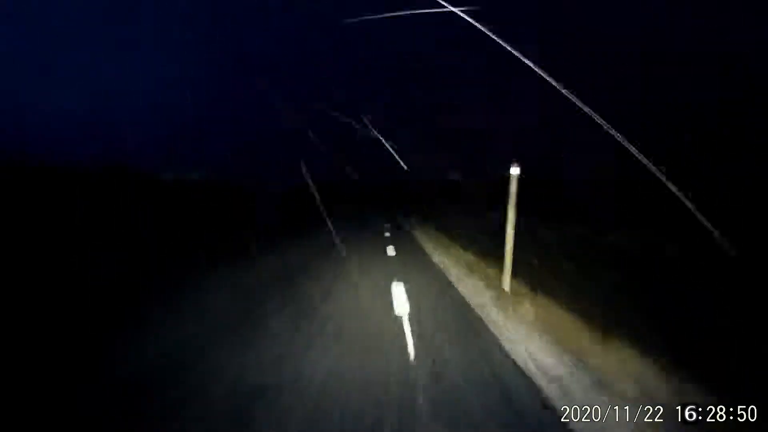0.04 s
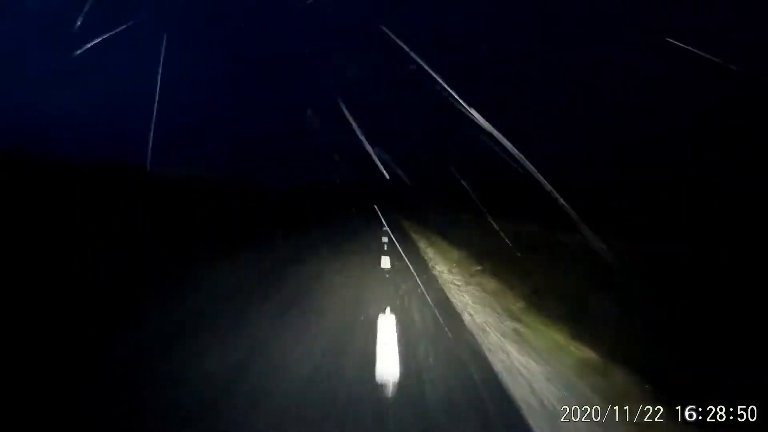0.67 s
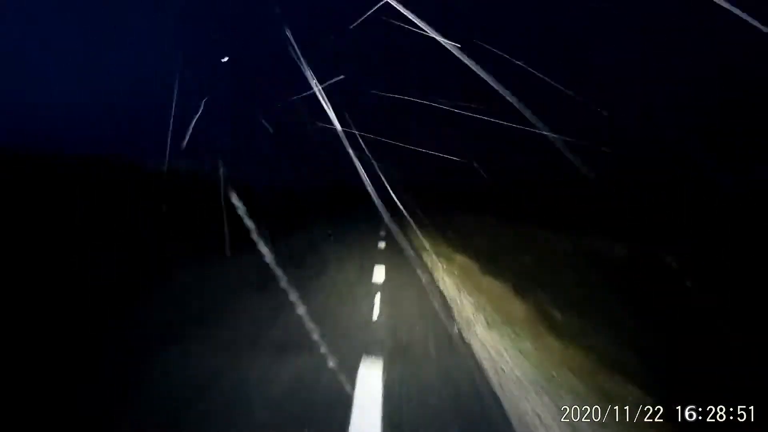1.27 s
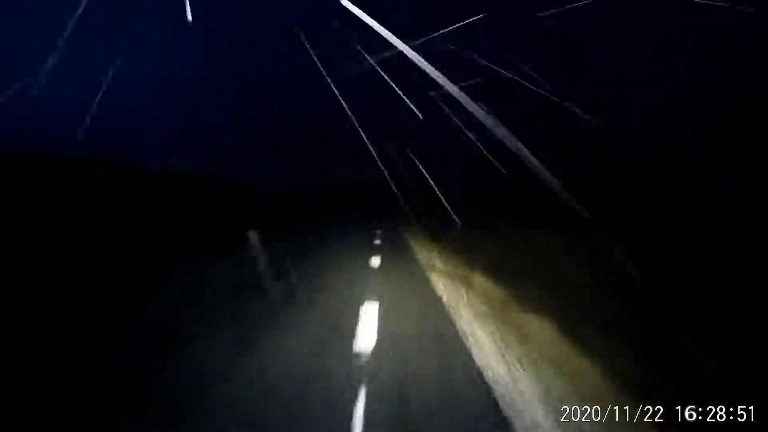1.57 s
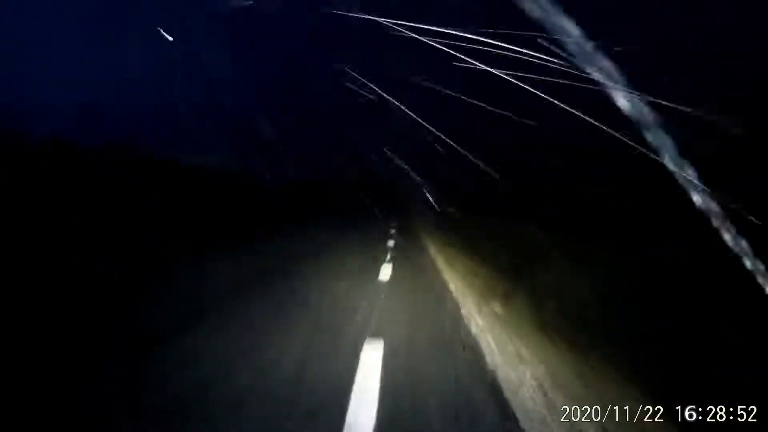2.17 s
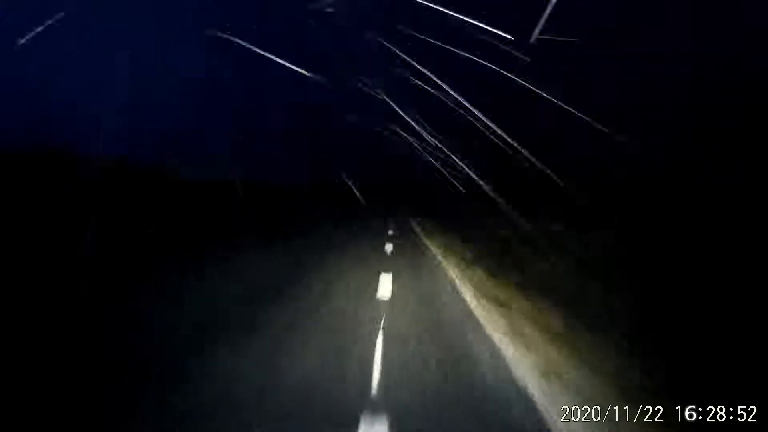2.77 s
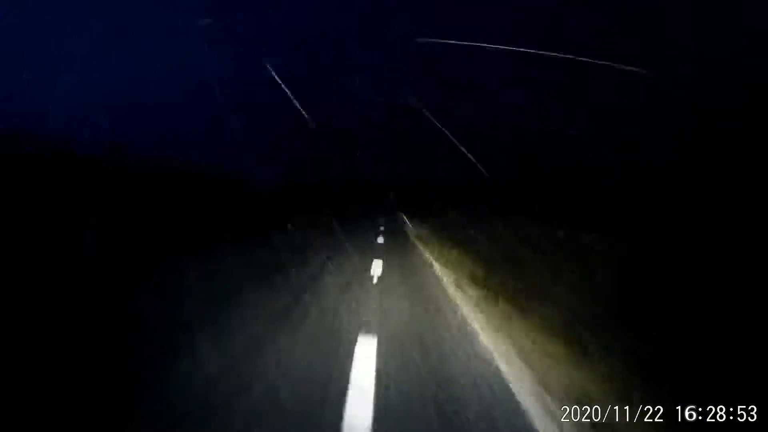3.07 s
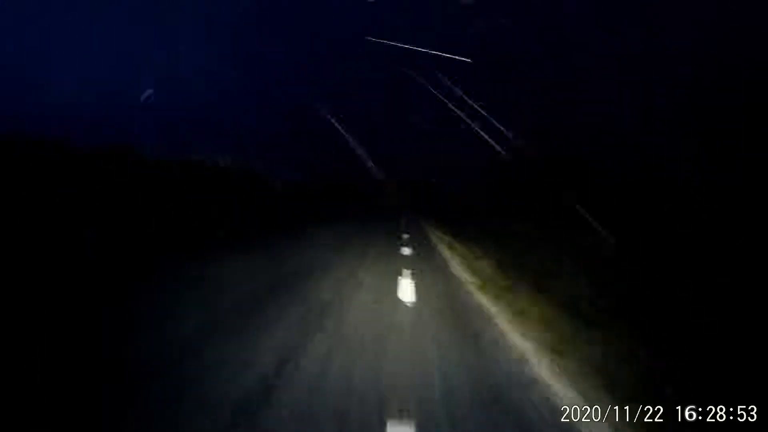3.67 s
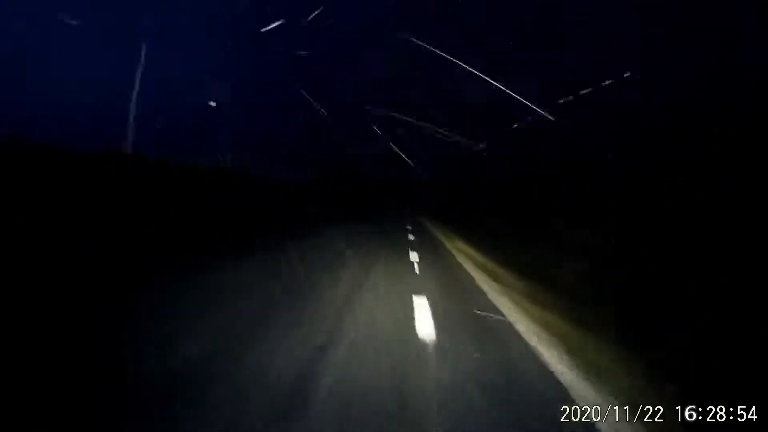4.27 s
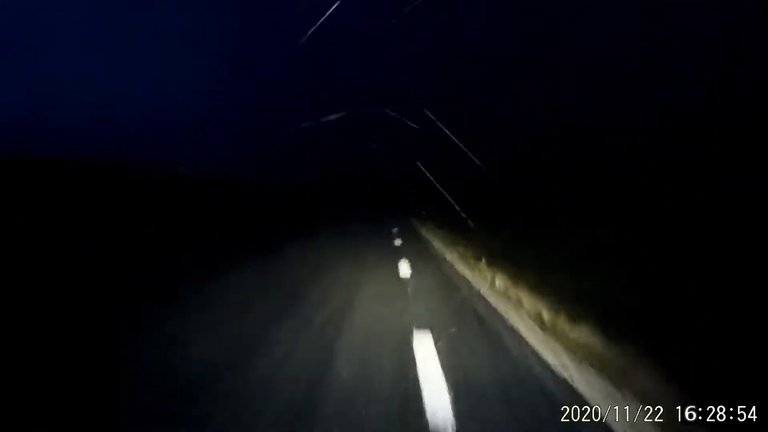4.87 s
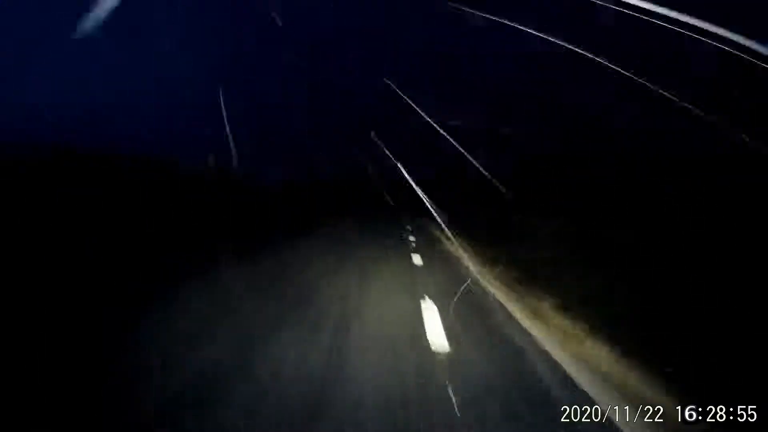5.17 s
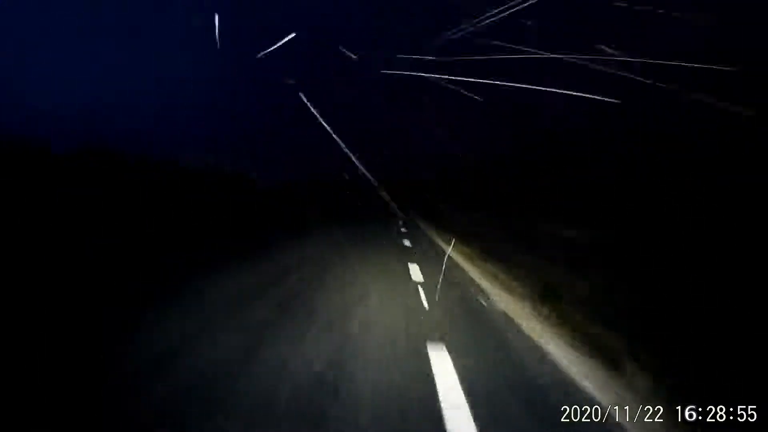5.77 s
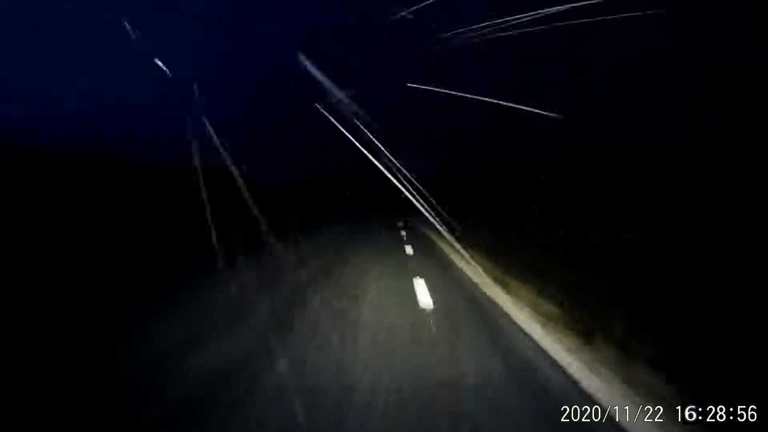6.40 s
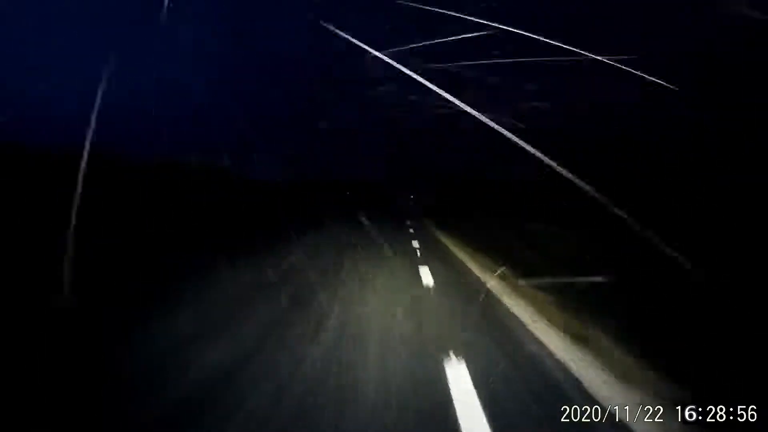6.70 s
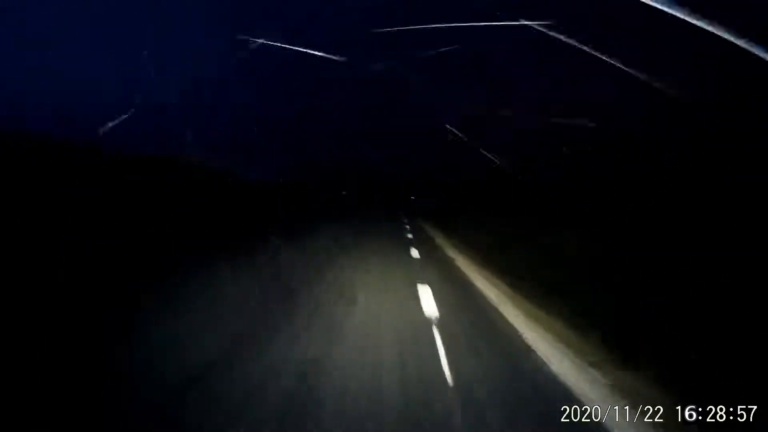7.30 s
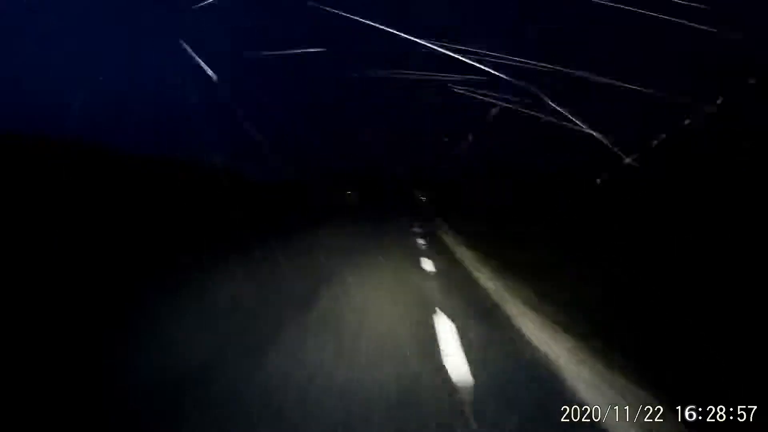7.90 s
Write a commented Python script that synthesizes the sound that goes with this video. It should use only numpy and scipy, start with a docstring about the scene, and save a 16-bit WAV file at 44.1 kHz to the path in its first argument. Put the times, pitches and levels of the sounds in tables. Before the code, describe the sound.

Irregular hailstones click against a rolling bike and its camera over tyre hiss and low rumble, with wind building later on.

```python
"""A bicycle on a country road in a night hail shower, heard from a camera fixed to it.
From the start the road shakes frame and mount, and the tyres hiss and spit wet grit. Hail ticks on
the camera shell, knocks on the bike and now and then pings off metal. Wind builds, puffs from 5 s
and swells over the microphone from 6 s. Near 7 s stones clack on hollow parts in a flurry;
by 8 s the gust has eased."""
import sys
import numpy as np
from scipy import signal
from scipy.fft import rfft, irfft
from scipy.io import wavfile
from scipy.ndimage import uniform_filter1d

SR = 44100
rng = np.random.default_rng(int(sys.argv[2]) if len(sys.argv) > 2 else 0)


def unload_audio(sound):
    """Save the sound as a 16-bit wav file, at the path given as the first command line argument."""
    columns = np.transpose(np.atleast_2d(sound))
    # keep every value between -1 and 1, then stretch to whole-number steps
    steps = np.round(np.clip(columns, -1, 1) * 32767)
    wavfile.write(sys.argv[1], SR, steps.astype(np.int16))


N = 355005

# Table levels are relative; each source adds its own gain.
# frame resonances: freq_hz, width_hz, level_db
FRAME_MODES = [(48.1, 29.3, -2.5), (133.6, 53, -6.5), (163.3, 60, 0.5), (247.3, 69.6, -5)]
# camera mount resonances: freq_hz, width_hz, level_db
MOUNT_MODES = [(423, 173, 4.5), (547, 145, -7), (700, 126, 0.6), (1049, 117, -6), (1216, 160, -4),
               (1345, 185, -10.5)]
# tubing and plastic resonances: freq_hz, width_hz, level_db
BIKE_MODES = [(1780, 600, 2.5), (2596, 490, 2.5), (3430, 410, -2), (4350, 460, -5), (4790, 340, -4),
              (5420, 710, 0), (6500, 800, -4.5), (7900, 770, -2), (9100, 2100, -2.5)]
# metal part modes: freq_hz, level_db, t60_s
METAL_MODES = [(3040, -5, 0.053), (4520, -15, 0.025), (6520, -2, 0.014), (9050, 3, 0.0093),
               (12200, -1.5, 0.016), (13950, -9, .018)]
# hollow part modes: pitch_ratio, level_db, t60_s
HOLLOW_MODES = [(0.66, -15, 0.0055), (1, 0, 0.0059), (1.3, -20, 0.004)]
# bumps and smooth patches: centre_s, length_s, frame_change_db, mount_change_db
ROAD_BUMPS = [(0.53, 0.063, 2.5, 4.5), (0.69, 0.037, 4.5, -1.5), (0.82, 0.16, -1, -4.5),
              (1.16, 0.3, -0.5, 2), (1.39, 0.027, 4, 5), (1.5, 0.06, 4, 4), (2.03, 0.16, 0.5, 3),
              (2.16, 0.049, -2, -2.5), (2.72, 0.085, 5, 0.5), (3.36, 0.17, 1.5, 2), (3.74, 0.066, 0, 3.5),
              (3.91, 0.13, 0, -4.5), (4.46, 0.081, 2, 4.5), (4.55, 0.076, -6, -1.5), (5.08, 0.054, 5, -1),
              (5.53, 0.033, -3, 0), (5.83, 0.06, -3.5, -3), (6.12, 0.054, 3.5, 4), (6.66, 0.39, 2, 2),
              (7.41, 0.11, 2, 6)]
# tyre spray spectrum: freq_hz, density_db
SPRAY_SPECTRUM = [(1000, 16.5), (1600, 6), (2000, 1), (2250, 1), (2640, 2.5), (3100, 0), (3480, 2),
                  (3950, -0.5), (4600, 2.5), (5000, -4.5), (5400, 2.5), (6200, -2.5), (7400, -1.5),
                  (8000, -1.5), (10000, -8.5), (12000, -9.5), (14200, -7), (15300, -8), (16500, -33)]
# spray and grit off the wet road: time_s, level_db
WET_CURVE = [(0.0, -57), (0.65, -58.5), (0.85, -60.5), (1.17, -56.5), (1.9, -61), (2.95, -60.5),
             (3.45, -57.5), (3.92, -61.5), (4.45, -57.5), (4.82, -59.5), (5.15, -58), (5.6, -59.5),
             (6.37, -54), (6.85, -52), (7.6, -52.5), (7.82, -57.5), (8.05, -55.5)]
# one long gust: time_s, level_db, turbulence_edge_hz
GUST_CURVE = [(0, -72, 900), (4.8, -50.5, 930), (5.85, -58, 930), (5.99, -37.5, 835), (6.27, -41.5, 1030),
              (6.35, -41, 1230), (6.5, -38, 1240), (6.62, -35.5, 1310), (6.95, -44.5, 1330),
              (7.06, -40.5, 2010), (7.16, -40.5, 1450), (7.33, -42.5, 1720), (7.7, -41.5, 1390),
              (7.86, -48, 1370), (8.05, -50, 1490)]
# puffs on top of the gust: centre_s, length_s, extra_db
AIR_PUFFS = [(5.09, 0.17, 15), (5.32, 0.1, 16), (5.72, 0.11, 18.5), (5.9, 0.03, 11.5), (6.35, 0.03, 7),
             (6.42, 0.064, 4), (7.425, 0.016, 7)]
# stones on metal: start_s, level_db, upper_modes_db
METAL_HITS = [(0.5822, -45, 0), (5.1652, -41.5, -6), (6.5065, -42, 1), (6.939, -34.5, -1)]
# hard stones on hollow parts: start_s, energy_db, pitch_hz
HOLLOW_HITS = [(3.3674, -14.5, 2700), (4.5255, -20.5, 1740), (7.0274, -23, 1800), (7.0306, -19, 1750),
               (7.037, -20, 2100), (7.0402, -18, 1700), (7.0503, -22, 1600), (7.06, -16, 2010),
               (7.068, -21, 1950), (7.079, -16, 1780), (7.0858, -10, 1850), (7.089, -17.5, 2000),
               (7.0922, -14.5, 2460), (7.1088, -19, 1740), (7.1186, -19, 1700), (7.1415, -20, 1750),
               (7.171, -25, 1600), (7.2935, -24, 1900), (7.3126, -12, 2020), (7.3205, -21, 1650),
               (7.365, -19, 2100), (7.388, -19, 1440), (7.428, -19, 1600), (7.4315, -21, 1500)]
# stones on the camera shell: start_s, ring_db, crack_db, body_db, ring_hz, crack_hz
SHELL_HITS = [(0.046, -29, -19, -31, 13900, 8800), (0.0797, -25, -19, -31, 14800, 8150),
              (0.2578, -32, -28, -28, 14100, 7100), (0.6412, -32, -24, -39, 13800, 8700),
              (0.65, -29, -24, -39, 14500, 8900), (1.0876, -21.5, -16.5, -22.5, 12400, 6400),
              (1.2428, -23.5, -19, -27, 12000, 6700), (1.5656, -28, -24.5, -29, 13300, 8100),
              (2.1575, -33, -32, -45, 13700, 7100), (2.5747, -20, -7, -34, 14200, 7700),
              (2.5854, -33, -19, -26, 12200, 8600), (2.9265, -31, -34, -39, 12800, 7700),
              (3.3666, -23, -18.5, -20, 13800, 7200), (3.432, -19, -15.5, -30, 11700, 7300),
              (3.5313, -28, -32, -46, 14100, 8900), (3.567, -28, -19.5, -34, 12200, 7900),
              (3.579, -28, -25, -21, 11800, 5900), (3.9341, -17.5, -14.5, -24, 11900, 6500),
              (4.155, -28, -22, -41, 14100, 8000), (4.276, -27, -21, -23, 11400, 6200),
              (5.1426, -3.5, -10, -20, 13900, 6000), (5.5985, -24, -19.5, -30, 12000, 6700),
              (6.7032, -27, -24.5, -36, 12100, 6400), (6.706, -29, -20, -35, 12100, 6600),
              (6.7394, -24, -19, -35, 12800, 7600), (6.7857, -21, -13, -17, 12000, 7700),
              (6.79, -14, -7.5, -27, 12300, 7200), (7.0818, -29, -17, -19, 13600, 6100),
              (7.2603, -19, -9, -25, 11700, 8750), (7.276, -25, -16, -35.5, 13100, 6800),
              (7.3617, -27, -18.5, -31, 11100, 8600), (7.4673, -10, -7.5, -17, 12900, 6100),
              (7.485, -22, -11, -29, 11700, 7600), (7.5305, -16, -10, -15, 12100, 6760)]
# distinct cracks and dull thuds on the bike and mount, from hail or a sudden puff: start_s, crack_db, pitch_hz,
# thud_db
KNOCKS = [(0.0415, -27, 4200, -20), (0.1375, -28, 3400, -32), (0.1734, -23.5, 3500, -31),
          (0.1835, -36, 2800, -34), (0.2671, -26, 2500, -32), (0.2743, -29, 3200, -19.5),
          (0.3284, -32, 3200, -36), (0.4442, -23.5, 3100, -21), (0.4511, -38, 3600, -28),
          (0.5197, -26.5, 2900, -31), (0.5435, -25.5, 2500, -16), (0.6816, -27, 3500, -29),
          (0.6999, -21, 3700, -21), (0.7864, -34, 3600, -26), (0.8475, -32, 3200, -35),
          (0.9351, -36, 4100, -31), (0.9872, -23.5, 3100, -23), (0.9941, -31, 3400, -24),
          (1.0059, -29, 3600, -28), (1.0307, -30, 2800, -35), (1.0852, -33, 3300, -15),
          (1.1201, -24, 3100, -39), (1.1398, -26, 4800, -17), (1.1571, -25, 5700, -26),
          (1.1731, -26, 2700, -16), (1.1963, -27, 2800, -21), (1.2296, -27, 2700, -26),
          (1.2546, -23, 2600, -21), (1.2664, -24, 3500, -24), (1.3229, -30, 3700, -38),
          (1.3865, -25.5, 3300, -21.5), (1.4608, -31, 5000, -30), (1.4841, -27, 3600, -25),
          (1.6403, -24, 4000, -32), (1.6476, -29, 4780, -39), (1.7297, -28.5, 7200, -36),
          (1.7475, -29, 3200, -19), (1.7943, -29, 4000, -24), (1.9455, -28, 3300, -27),
          (2.0173, -26, 3200, -32), (2.0263, -24.5, 2980, -28), (2.2849, -26, 3100, -20),
          (2.332, -30, 5300, -28), (2.4777, -33, 2800, -22), (2.5263, -25.5, 3400, -22),
          (2.5601, -29, 5300, -39), (2.736, -30, 4300, -26), (2.7715, -30, 2900, -24),
          (2.9553, -28, 6500, -37), (3.0493, -32, 3600, -39), (3.1368, -27, 3600, -13.5),
          (3.1499, -27, 4600, -30), (3.306, -29, 5000, -19.5), (3.3169, -28, 3700, -26),
          (3.3265, -28, 3000, -29), (3.412, -25, 3700, -17), (3.4244, -28, 3100, -21),
          (3.474, -29, 3800, -24), (3.5938, -23.5, 4500, -26), (3.6558, -26, 4380, -32),
          (4.1085, -25, 5200, -23), (4.2135, -27, 4100, -19.5), (4.2613, -27, 4000, -22),
          (4.3456, -24, 4880, -18), (4.3948, -31, 4000, -20), (4.4686, -27.5, 3300, -33),
          (4.5254, -24.5, 4600, -34), (4.6117, -28, 2900, -18), (4.6523, -25, 4000, -22),
          (4.746, -27.5, 3700, -30), (4.8238, -34, 3900, -19), (4.8625, -23.5, 4600, -19),
          (4.9206, -31, 3300, -20), (4.9927, -26.5, 5800, -36), (5.0238, -28, 3700, -26),
          (5.0505, -25, 4800, -22), (5.1655, -30, 5100, -32), (5.2518, -31, 3400, -30),
          (5.266, -26, 4300, -21), (5.2998, -27, 5300, -26), (5.4836, -26.5, 4300, -22),
          (5.5039, -25.5, 3500, -21), (5.6775, -46, 3800, -22.5), (5.7635, -23, 5000, -16),
          (5.8895, -28, 5000, -21), (5.955, -34, 3500, -21), (6.244, -27, 5100, -17),
          (6.2787, -27, 4400, -15), (6.299, -38, 3500, -22), (6.3372, -39, 3200, -12),
          (6.4125, -34, 3400, -12.5), (6.429, -23, 2700, -14), (6.6088, -26, 2500, -20),
          (6.7228, -23, 2500, -27), (6.8635, -22, 3400, -19), (6.8975, -20, 3900, -16.5),
          (6.9814, -26.5, 3900, -16), (7.0399, -21, 2900, -19), (7.05, -21, 4100, -28),
          (7.1087, -23, 2400, -14), (7.1826, -25, 5100, -29), (7.2891, -24, 3400, -14),
          (7.3293, -24, 5230, -20), (7.3475, -21, 2700, -16), (7.427, -21, 3400, -12),
          (7.5186, -25, 5100, -32), (7.6045, -23, 3500, -19), (7.6312, -26, 4600, -25.5),
          (7.6799, -24, 5000, -24), (7.9829, -24, 2700, -29), (8.022, -29, 3400, -22)]

WHEEL_HZ, WHEEL_PEAK_S = 2.97, 0.004


def from_db(db):
    return 10 ** (np.asarray(db) / 20)


def unit_rms(x):
    return x / np.sqrt(np.mean(x ** 2) + 1e-20)


def unit_energy(x):
    return x / np.sqrt(np.sum(x ** 2) + 1e-20)


def evened(x, window_s):
    """Divide by the running rms."""
    return x / np.sqrt(np.maximum(uniform_filter1d(x ** 2, int(window_s * SR) + 1), 1e-12))


def curves(rows):
    """Table columns interpolated to every sample."""
    time_s, *columns = np.transpose(rows)
    return [np.interp(np.arange(N) / SR, time_s, column) for column in columns]


def swells(rows):
    """Gaussian rises and dips, one dB curve per level column."""
    t = np.arange(N) / SR
    return sum(np.outer(levels_db, np.exp(-(2 * (t - centre_s) / length_s) ** 2))
               for centre_s, length_s, *levels_db in rows)


def drift(rate_hz):
    """Smooth random wander, rms 1."""
    hop, settle = 40, 2000
    pole = np.exp(-2 * np.pi * rate_hz * hop / SR)
    noise = rng.standard_normal(N // hop + settle + 2)
    slow = signal.lfilter([1], [1, -2 * pole, pole * pole], noise)[settle:]
    return np.interp(np.arange(N) / hop, np.arange(len(slow)), unit_rms(slow))


def butter(x, cutoff_hz, kind, order=2):
    return signal.sosfilt(signal.butter(order, cutoff_hz, kind, fs=SR, output="sos"), x)


def resonate(x, hz, width_hz):
    r = np.exp(-np.pi * width_hz / SR)
    feedback = [1, -2 * r * np.cos(2 * np.pi * hz / SR), r * r]
    return signal.lfilter(np.array([1, 0, -1]) * (1 - r * r) / 2, feedback, x)


def coupling(mode_hz, pitch_hz, span_octaves):
    """How strongly a contact of a given pitch excites a mode."""
    return 1 / np.sqrt(1 + (2 * np.log2(mode_hz / pitch_hz) / span_octaves) ** 2)


def add(out, start_s, sound):
    at = int(np.clip(round(start_s * SR), 0, N - 1))
    out[at:at + len(sound)] += sound[:N - at]


def shaken(modes):
    """Steep-sided resonances driven by random road bumps; rms 1."""
    out = 0
    for hz, width_hz, db in modes:
        band = resonate(rng.standard_normal(N), hz, width_hz)
        out += from_db(db) * unit_rms(resonate(band, hz, width_hz))
    return unit_rms(out)


def frame_rumble(load_db):
    """The road shakes the frame's low modes."""
    level_db = -40.5 + load_db + drift(2.3)
    return from_db(level_db) * evened(shaken(FRAME_MODES), window_s=0.13)


def tyre_hiss(clumps):
    """Water torn from the road by the tread; rms 1."""
    hz, db = np.transpose(SPRAY_SPECTRUM)
    bins_hz = np.fft.rfftfreq(N, 1 / SR) + 1
    colour = from_db(np.interp(np.log(bins_hz), np.log(hz), db))
    spray = irfft(rfft(clumps * rng.standard_normal(N)) * colour, N)
    return unit_rms(butter(spray, 1060, "high"))


def grains(clumps, base_per_s, spread_db):
    """Random contacts of uneven size, crowded into clumps."""
    born = rng.random(N) < base_per_s * clumps ** 2 / SR
    size_db = spread_db * np.minimum(rng.exponential(1, N), 3)
    return born * from_db(size_db) * rng.choice([-1, 1], N)


def grit_patter(clumps):
    """Grit and small ice tap the bike's modes, each grain around its own pitch; rms 1."""
    clicks = grains(clumps, base_per_s=160, spread_db=2.5)
    low_hz, high_hz = BIKE_MODES[0][0], BIKE_MODES[-1][0]
    pitch_hz = low_hz * (high_hz / low_hz) ** rng.random(N)
    ticks = 0
    for hz, width_hz, db in BIKE_MODES:
        taps = clicks * coupling(hz, pitch_hz, span_octaves=0.39) * rng.choice([-1, 1], N)
        ticks += from_db(db) * resonate(taps + 1e-18, hz, width_hz) / np.sqrt(width_hz)
    return unit_rms(butter(ticks, [1500, 9500], "band"))


def sleet(clumps):
    """The finest ice pricks the camera shell; rms 1."""
    clicks = grains(clumps, base_per_s=100, spread_db=-1.0)
    return unit_rms(resonate(clicks + 1e-18, hz=13500, width_hz=3200))


def mount_buzz(load_db, wind_db):
    """The mount buzzes with the road; wind shakes it harder."""
    road_db = -45.5 + load_db + 1.82 * drift(15)
    drive = np.hypot(from_db(road_db), from_db(wind_db - 7.5))
    buzz = shaken(MOUNT_MODES) * from_db(2.0 * drift(51))
    return drive * evened(buzz, window_s=0.066)


def wind_roar(wind_db, edge_hz):
    """Eddies at the microphone port: fluttering half-octave bands, rolled off above edge_hz."""
    shared_db = 2.0 * np.clip(drift(35), -2, 1.5)
    eddies = 0
    for hz in 100 * 2 ** np.arange(0, 6.5, 0.5):
        band = unit_rms(butter(rng.standard_normal(N), [hz / 2 ** 0.25, hz * 2 ** 0.25], "band"))
        shape = 1 / np.sqrt(1 + (hz / edge_hz) ** 10.5) / np.sqrt(1 + (0.26 * edge_hz / hz) ** 2.4)
        own_db = 3.5 * np.clip(drift(93), -2, 1.5)
        eddies += band * shape * from_db(shared_db + own_db)
    return from_db(wind_db) * evened(eddies, window_s=0.19)


def impact(modes, detune, contact_s):
    """One blow; the spot struck shifts and weights the modes. Unit energy."""
    t = np.arange(SR // 25) / SR
    ring = 0
    for hz, db, t60_s in modes:
        shift, weight, phase = rng.standard_normal(3)
        envelope = from_db(db + 2 * weight - 60 * t / t60_s)
        ring += envelope * np.sin(2 * np.pi * (hz * (1 + detune * shift) * t + phase))
    attack = 1 - np.exp(-(t / contact_s) ** 2)
    return unit_energy(ring * attack)


def ice_contact(t60_s, splinter_db):
    """A sharp contact, then a dying spray of splinters."""
    t = np.arange(SR // 40) / SR
    splinters = unit_energy(rng.standard_normal(len(t)) * from_db(-60 * t / t60_s))
    return signal.unit_impulse(len(t)) + from_db(splinter_db) * splinters


def metal_pings():
    """Stones glance off metal; a harder touch brings out the upper modes."""
    out, t = np.zeros(N), np.arange(SR // 8) / SR
    lowest, *upper = [from_db(db - 60 * t / t60_s) * np.sin(2 * np.pi * hz * t)
                      for hz, db, t60_s in METAL_MODES]
    for start_s, db, upper_db in METAL_HITS:
        add(out, start_s, from_db(db) * (lowest + from_db(upper_db) * sum(upper)))
    return out


def hollow_clacks():
    """Each struck hollow part rings for a few cycles at its own pitch."""
    out = np.zeros(N)
    for start_s, db, pitch_hz in HOLLOW_HITS:
        modes = [(pitch_hz * ratio, mode_db, t60_s) for ratio, mode_db, t60_s in HOLLOW_MODES]
        add(out, start_s, from_db(db) * impact(modes, detune=0.015, contact_s=0.00025))
    return out


def shell_ticks():
    """Hard ice on the plastic camera shell: high ring, thin crack, a little low body."""
    out, click = np.zeros(N), signal.unit_impulse(SR // 100)
    body = butter(click, [1500, 4400], "band")
    for start_s, ring_db, crack_db, body_db, ring_hz, crack_hz in SHELL_HITS:
        ring = resonate(click, ring_hz, width_hz=1500)
        ring = butter(butter(ring, 5200, "high"), 6000, "high")
        crack = resonate(ice_contact(t60_s=0.0075, splinter_db=-7.5), crack_hz, width_hz=1550)
        crack = butter(butter(crack, 3700, "high"), [4400, 11000], "band")
        add(out, start_s, from_db(ring_db + 4.5) * unit_energy(ring))
        add(out, start_s, from_db(crack_db - 3.0) * unit_energy(crack))
        add(out, start_s, from_db(body_db - 2.0) * unit_energy(body))
    return out


def small_stones(shower_db):
    """Random light hits, denser and harder as shower_db rises; rows as in KNOCKS."""
    chance = rng.random(N)
    size, pitch = np.clip(rng.standard_normal((2, N)), -2, 2)
    rate_per_s = 20 * from_db(shower_db)
    at = np.flatnonzero(chance < rate_per_s / SR)
    crack_db = -32 + 0.47 * shower_db[at] + 1.5 * size[at]
    pitch_hz = 4100 * 2 ** (0.14 * pitch[at])
    thud_db = crack_db + 6.5
    return list(zip(at / SR, crack_db, pitch_hz, thud_db))


def bike_crack(pitch_hz):
    """A snap rings the modes near pitch_hz; the spot struck sets their sign and strength. Unit energy."""
    contact = ice_contact(t60_s=0.029, splinter_db=-5.5)
    ring = 0
    for hz, width_hz, db in BIKE_MODES:
        weight = rng.choice([-1, 1]) * from_db(db + 2.5 * rng.standard_normal())
        ring += weight * coupling(hz, pitch_hz, span_octaves=0.78) * resonate(contact, hz, width_hz)
    snap = butter(signal.unit_impulse(len(contact)), [pitch_hz / 2, pitch_hz * 2], "band")
    crack = unit_energy(ring) + from_db(-18) * unit_energy(snap)
    return unit_energy(butter(crack, 9300, "low"))


def bike_knocks(stones):
    """Each knock cracks on the bike and jolts the mount; a weaker crack follows a few ms later."""
    out = np.zeros(N)
    thud_modes = [(hz, db, 0.02) for hz, _, db in MOUNT_MODES[3:]]
    for start_s, crack_db, pitch_hz, thud_db in stones:
        add(out, start_s, from_db(crack_db + 1) * bike_crack(pitch_hz))
        rebound_s = start_s + rng.uniform(0.003, 0.009)
        add(out, rebound_s, from_db(crack_db - 10) * bike_crack(pitch_hz))
        add(out, start_s, from_db(thud_db + 0.5) * impact(thud_modes, detune=0.022, contact_s=0.00027))
    return out


def scene():
    """Wheel turns and bumps shake the bike, spray hisses, the gust roars, hail strikes."""
    # each wheel turn loads frame and mount once and throws up more spray
    wheel = np.cos(2 * np.pi * WHEEL_HZ * (np.arange(N) / SR - WHEEL_PEAK_S))
    frame_bump_db, mount_bump_db = swells(ROAD_BUMPS)
    gust_db, edge_hz = curves(GUST_CURVE)
    wind_db = gust_db + swells(AIR_PUFFS)[0]
    wet_db = curves(WET_CURVE)[0] + wheel
    frame = frame_rumble(frame_bump_db + 0.73 * wheel)
    clumps = from_db(2.67 * drift(85))
    tyres = from_db(wet_db + 3.0) * tyre_hiss(clumps)
    grit = from_db(wet_db - 4.5) * grit_patter(clumps)
    ice = from_db(wet_db - 16.5) * sleet(clumps)
    mount = mount_buzz(mount_bump_db + 0.33 * wheel, wind_db)
    wind = wind_roar(wind_db, edge_hz)
    hail = shell_ticks() + metal_pings() + hollow_clacks() + bike_knocks(KNOCKS)
    hail += bike_knocks(small_stones(wet_db - wet_db.mean()))
    return (frame + tyres + grit + ice + mount + wind + hail)[None]


def record(dry):
    """The camera cuts the deepest bass and the top."""
    return butter(butter(dry, 11, "high"), 16400, "low", order=20)


dry = scene()
out = record(dry)
unload_audio(out)
```